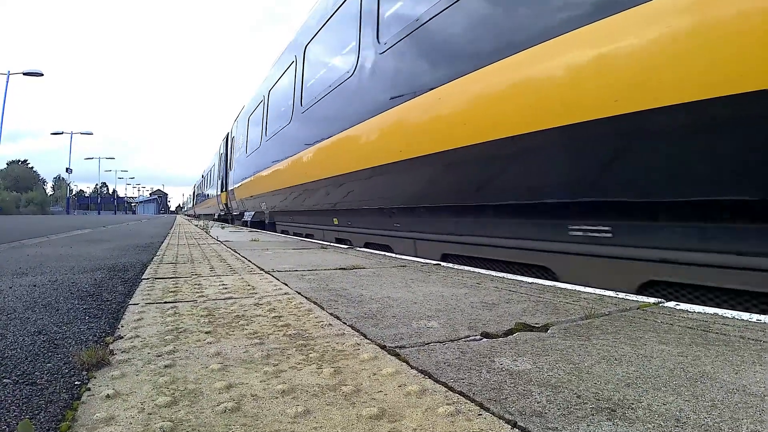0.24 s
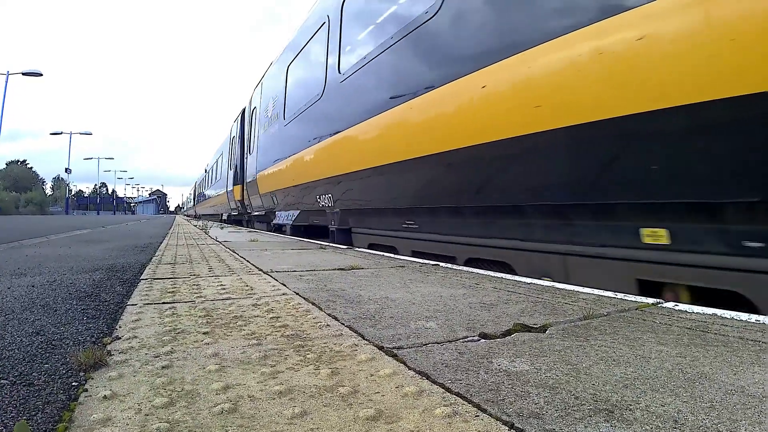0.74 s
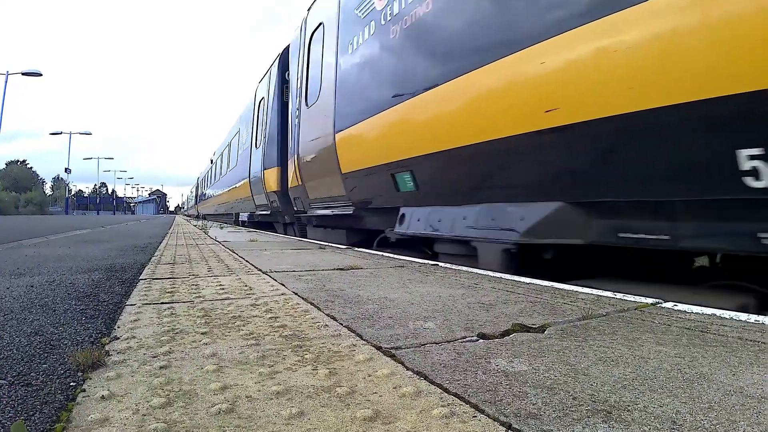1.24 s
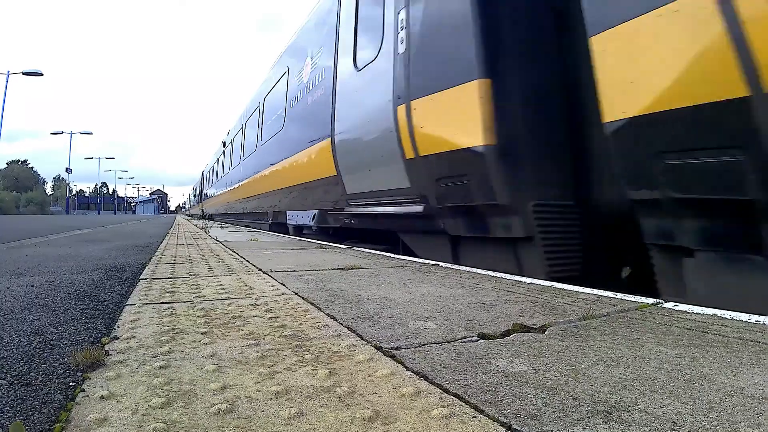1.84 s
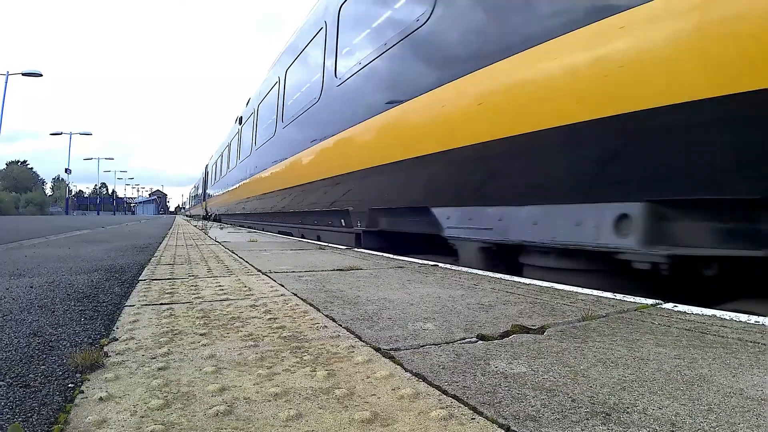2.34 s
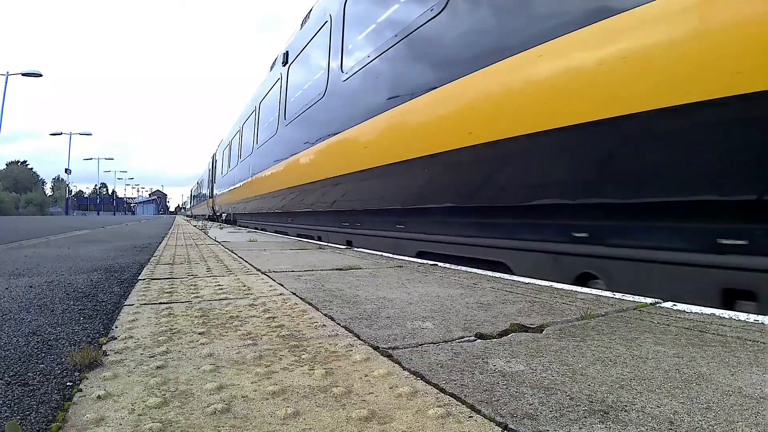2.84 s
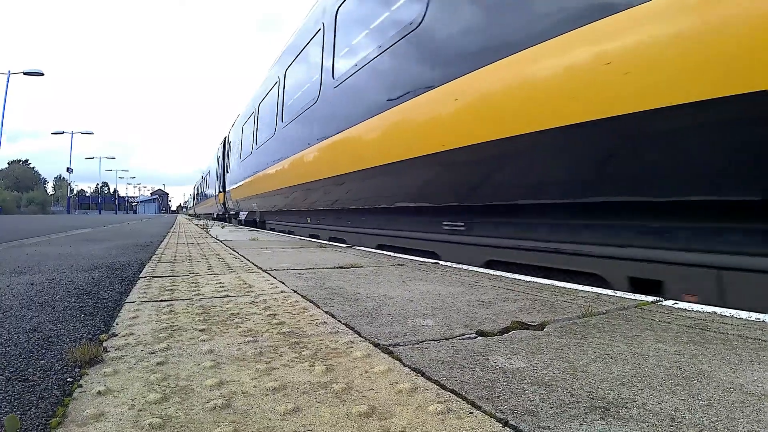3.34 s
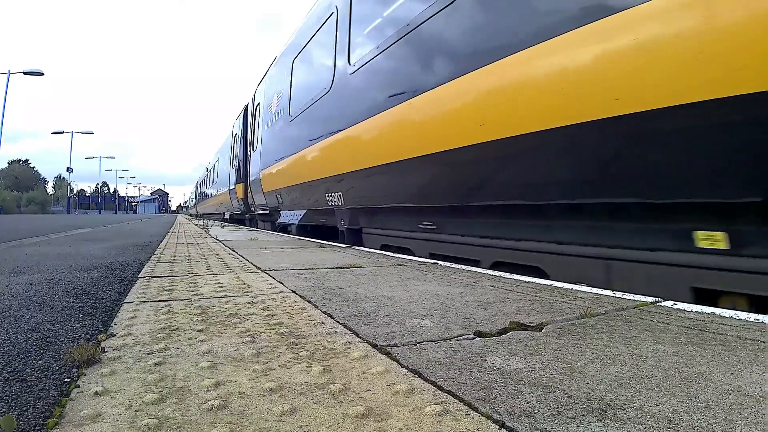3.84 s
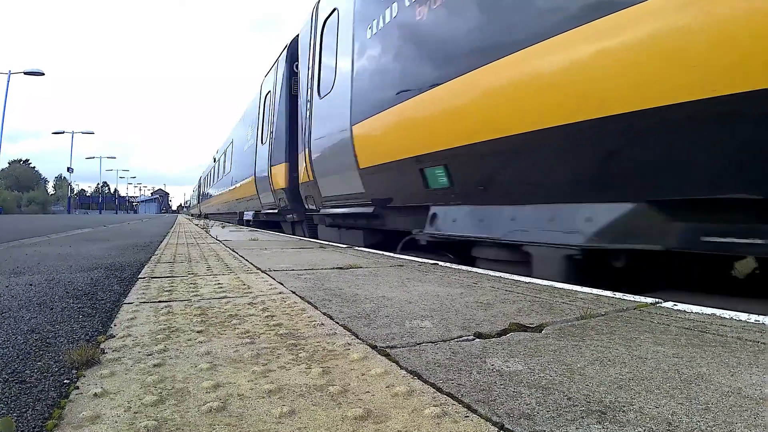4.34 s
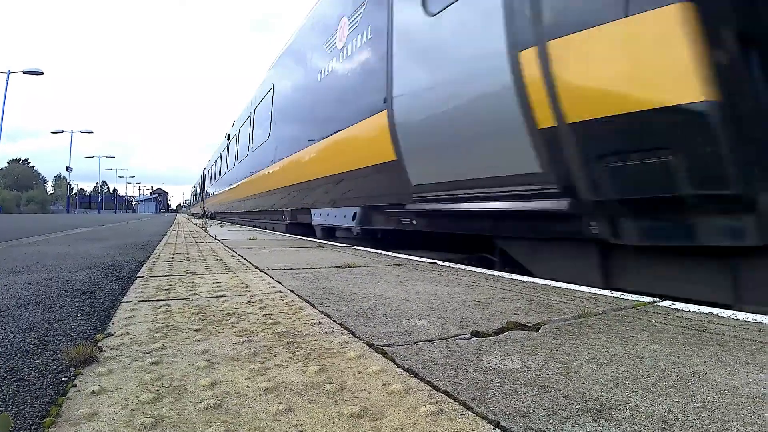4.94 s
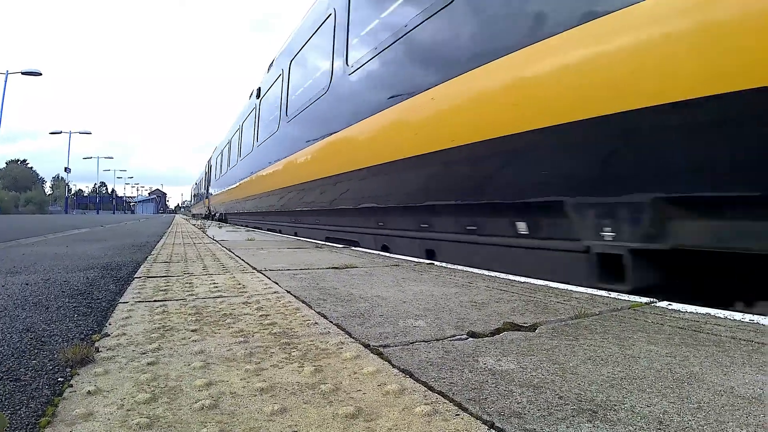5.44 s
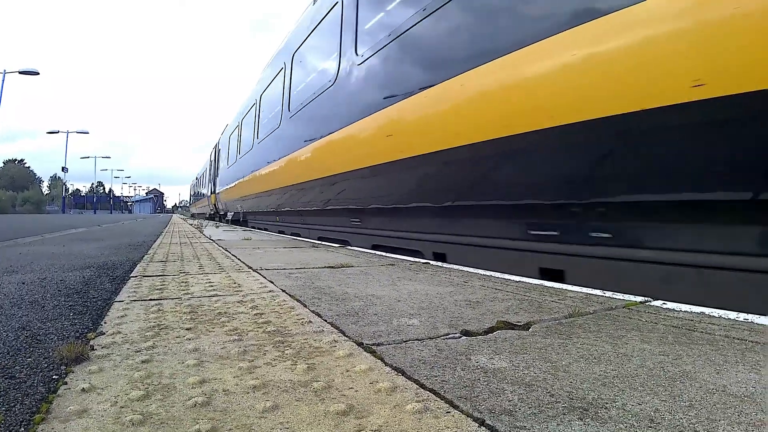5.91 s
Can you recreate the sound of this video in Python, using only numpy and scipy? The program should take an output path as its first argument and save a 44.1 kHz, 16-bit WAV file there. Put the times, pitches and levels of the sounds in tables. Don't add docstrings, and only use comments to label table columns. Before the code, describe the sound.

A diesel train is already passing close by an open platform, and keeps passing to the end, about 6.2 seconds. A deep, buzzing drone around 90 Hz dominates, throbbing and briefly dipping as engines beat against one another. From 0.3 to 1.5 s a rough casing roar and metallic rattle lie over it, with wheel rumble, low thuds and short rail ringing, brightest near 0.7 s. Knocks come at 0.9 and 1.65 s, then a loud dull one at 2.0 s. The drone is strongest and most overloaded around 1.6 to 2.3 s, then eases, lowest near 3.4 s, with faint pings and chirps around 2.7 and 3.1 s. It wavers on, with low chirps at 4.65 and 4.85 s, soft knocks and chirps near 5.2 to 5.5 s, before drone, roar and rumble surge from 5.8 s. The microphone is close, muffled, clipped and grainy.

```python
import sys
import numpy as np
from scipy import signal
from scipy.fft import rfft, irfft, next_fast_len
from scipy.io import wavfile
from scipy.ndimage import uniform_filter1d, map_coordinates

SR = 44100
rng = np.random.default_rng(int(sys.argv[2]) if len(sys.argv) > 2 else 0)


def ratio(d):
    e = np.asarray(d, float) / 20
    return 10 ** e


def generate_wav(sig):
    pcm = np.round(np.clip(np.atleast_2d(sig).T, -1, 1) * 32767).astype(np.int16)
    wavfile.write(sys.argv[1], SR, pcm)


N = 272097


def unit(x):
    return x / np.sqrt(np.mean(x ** 2) + 1e-20)


def curves(rows):
    seconds, *columns = np.transpose(rows)
    return [np.interp(np.arange(N) / SR, seconds, column) for column in columns]


def wobble(rate):
    points = rng.standard_normal(int(N * rate / SR) + 4)
    return map_coordinates(points, [np.arange(N) * rate / SR])


def filtered(x, response):
    size = next_fast_len(N + 8192)
    return irfft(rfft(x, size) * response(np.fft.rfftfreq(size, 1 / SR)), size)[:N]


def rush(spectrum, patchy_db):
    z = signal.stft(rng.standard_normal(N), nperseg=1024)[2]
    patches = uniform_filter1d(rng.standard_normal(z.shape), 5, 0)
    patches = uniform_filter1d(patches, 5, 1)
    noise = signal.istft(z * ratio(patchy_db * unit(patches)), nperseg=1024)[1][:N]
    f, db = np.transpose(spectrum)
    return unit(filtered(noise, lambda hz: ratio(np.interp(np.log(hz + 1), np.log(f + 1), db))))


def swells(s, width, *peaks_db):
    coarse = np.arange(0, N + 99, 100)
    bells = np.exp(-((coarse / SR - s[:, None]) / width[:, None]) ** 2)
    return [np.interp(np.arange(N), coarse, np.sqrt(ratio(2 * db) @ bells ** 2)) for db in peaks_db]


def swell(rows, rest_db):
    s, db, width = np.transpose(rows)
    return np.hypot(swells(s, width, db)[0], ratio(rest_db))


def drone_db():
    # time in seconds, firing tone in dB.
    nearest = [(0.0, -15), (0.15, -7), (0.27, -6.5), (0.95, -6.5), (1.25, -7.5), (1.6, -4.5), (1.84, -4),
               (2.37, -6), (2.99, -9), (3.44, -15.5), (3.73, -10.5), (4.15, -9.5), (4.8, -12), (5.0, -8.5),
               (5.4, -12.5), (5.65, -6.5), (5.9, -10), (6.17, -3)]
    # time in seconds, depth in dB, half width in seconds.
    beats = [(.38, -21.5, .05), (0.734, -26.5, .05), (1.078, -13.5, .06), (1.421, -3, 0.095),
             (1.7, -1.5, .05), (2.44, -1.5, 0.054), (3.985, -8, 0.11), (4.32, -14.5, 0.076),
             (4.611, -10.5, .06), (5.143, -18.5, .075), (5.36, -4, 0.058), (5.53, -27.5, 0.088),
             (5.799, -3, 0.038), (5.979, -6, 0.079)]
    t = np.arange(0, N + 99, 100) / SR
    power_left = [1 - (1 - ratio(2 * db)) * np.exp(-((t - s) / width) ** 2) for s, db, width in beats]
    dips_db = 10 * np.log10(np.prod(power_left, axis=0))
    return curves(nearest)[0] + np.interp(np.arange(N) / SR, t, dips_db)


def exhaust(phase):
    # time in seconds, peak in dB, half width in seconds.
    lopes = [(.03, -13, .05), (.33, -17, .1), (.85, -20.5, 0.24), (1.39, -13, .05), (1.52, -20.5, 0.06),
             (1.7, -12.5, 0.079), (2.2, -19.5, .15), (2.49, -21, 0.14), (2.83, -12, 0.076),
             (3.1, -24, 0.24), (3.33, -21, 0.068), (3.82, -24.5, 0.23), (5.7, -16.5, 0.062),
             (6.05, -29, .06)]
    # time in seconds, peak in dB, half width in seconds.
    overtone = [(0, -16, 0.048), (.25, -30, 0.14), (.42, -21, .08), (.72, -21, 0.049), (1.1, -21, 0.11),
                (1.39, -21, 0.046), (1.73, -13, 0.073), (2.4, -26, 0.036), (2.7, -28, 0.065),
                (2.9, -28.5, 0.16), (3.2, -25.5, 0.064), (3.55, -24, 0.098), (3.9, -28.5, .12),
                (4.13, -25.5, 0.048), (4.4, -27.5, 0.15), (4.85, -28, 0.082), (5.15, -28, 0.11),
                (5.55, -27.5, 0.14), (5.9, -22.5, 0.091), (6.17, -14, 0.031)]
    # multiple of the firing rate, level in dB.
    weak_orders = [(1.5, -3.5), (2.5, -19), (3, -6.5), (3.5, -7.5), (4, -12.5), (6, -11.5)]
    firing = ratio(drone_db() + 4.5) * np.sin(phase + 0.2 * wobble(14) + 0.096 * wobble(40))
    half_gain = swell(lopes, rest_db=-32) * ratio(4.0 + 1.6 * wobble(6.2))
    half = half_gain * np.sin(phase / 2 + 0.67 * wobble(12))
    double_gain = swell(overtone, rest_db=-37) * ratio(4.5)
    double = double_gain * np.sin(2 * phase + 0.78 * wobble(12))
    out = firing + half + double
    for multiple, db in weak_orders:
        out += ratio(db - 28.0 + 4.5 * wobble(8)) * np.sin(multiple * phase + 1.9 * wobble(10))
    return out


def wheels():
    # time in seconds, rumble in dB.
    bogies = [(0, -20.5), (.29, -25), (.38, -21), (.77, -17.5), (.88, -23), (1.06, -20), (1.44, -21),
              (1.65, -19.5), (1.84, -30), (2.06, -24), (2.2, -30.5), (3, -30), (3.8, -34.5), (4.6, -28),
              (5.45, -24.5), (5.8, -21.5), (6.1, -19), (6.17, -11.5)]
    # time in seconds, peak in dB, half width in seconds.
    thuds = [
        (.33, -20, 0.1),
        (1.05, -16.5, 0.093),
        (1.8, -18.5, 0.07),
        (2.15, -25.5, .1),
        (2.6, -22, .12),
        (3.86, -31.5, 0.076),
        (4.4, -30.5, 0.091),
        (5.19, -21, 0.045),
        (5.95, -18.5, 0.087),
    ]
    # frequency in Hz, level in dB per Hz.
    ground_colour = [(12, -37), (24, 2), (40, 2), (65, 3.5), (90, -2), (120, -40)]
    # frequency in Hz, level in dB per Hz.
    thrum_colour = [(70, -36.5), (100, 10.5), (130, 5.5), (170, 8), (210, 3.5), (270, -41.5)]
    # frequency in Hz, level in dB per Hz.
    wheel_colour = [(120, -34), (200, -10.5), (243, -2.5), (270, 0), (317, 1.5), (383, -5.5), (428, -4.5),
                    (700, -17.5), (910, -40.5), (1540, -120)]
    rumble_db = curves(bogies)[0]
    nearer_db = rumble_db + 29
    shake_db = -32.5 + 0.7 * nearer_db + 2.0 * wobble(5)
    thrum_db = -28 + 0.43 * nearer_db
    ground = ratio(shake_db + 4.0) * rush(ground_colour, patchy_db=3.0)
    thrum = swell(thuds, thrum_db) * ratio(-1.0) * rush(thrum_colour, patchy_db=-0.6)
    rumble = ratio(rumble_db + 2.5 + 0.39 * wobble(12)) * rush(wheel_colour, patchy_db=1.5)
    return ground + thrum + rumble


def casing(phase):
    # time in seconds, roar in dB.
    engines = [(0, -22.5), (.25, -20.5), (.32, -17.5), (.6, -17), (.72, -14), (.95, -15.5), (1.25, -18),
               (1.49, -20), (1.54, -27), (1.88, -31), (2.1, -29.5), (2.75, -30), (3.6, -34), (4.3, -31.5),
               (4.8, -28.5), (5.4, -27.5), (5.95, -17.5), (6.17, -19)]
    # frequency in Hz, level in dB per Hz.
    far_colour = [(350, -36), (600, 4.5), (618, -10), (794, 0.5), (1230, -1.5), (1330, 1.5), (1520, -9.5),
                  (1720, -9), (1900, -19), (2470, -42.5), (4180, -120)]
    # frequency in Hz, level in dB per Hz.
    near_colour = [(350, -35), (600, 0.5), (664, -11), (717, 4.5), (775, -5), (849, 0), (935, -3.5),
                   (1300, -1), (1900, -11), (2470, -44), (4180, -120)]
    # frequency in Hz, level in dB per Hz.
    rattle_colour = [(1000, -28), (1700, -1.5), (1910, -3), (2300, -4), (2460, -8), (2820, -16),
                     (3420, -22), (4000, -27.5), (5200, -58), (8800, -120)]
    roar_db = curves(engines)[0]
    lag_s = 0.056
    late_roar_db = curves(np.add(engines, [lag_s, 0]))[0]
    rattle_db = -41.5 + 1.06 * (late_roar_db + 29) + 0.58 * wobble(9.8)
    near = np.clip((roar_db + 29) / 8, 0, 1)
    roar = np.sqrt(1 - near) * rush(far_colour, patchy_db=0.8)
    roar += np.sqrt(near) * rush(near_colour, patchy_db=1.5)
    roar *= ratio(roar_db - 0.57 + 0.4 * wobble(12))
    rattle = ratio(rattle_db + 1.0) * rush(rattle_colour, patchy_db=1.0)
    throb = ratio(0.57 * np.sin(phase) + 0.13 * wobble(30))
    return unit(throb) * (roar + rattle)


def rail():
    # time in seconds, half width in seconds,
    # level of the wheel disc in dB, of low rail tones in dB, of high rail tones in dB.
    passes = [
        (.12, .07, -26.5, -35.5, -34),
        (0.499, .07, -19.5, -27, -31.5),
        (0.601, 0.037, -21.5, -27.5, -38),
        (.72, 0.09, -22, -19.5, -17),
        (1.05, .12, -27, -30, -28),
        (1.411, 0.054, -28.5, -32.5, -32),
    ]
    # pitch in Hz, unsteadiness per second, level in dB.
    disc_modes = [(532.6, 14, 3)]
    # pitch in Hz, width in Hz (also unsteadiness per second), level in dB.
    low_modes = [(250.7, 14, 2.5), (309, 17, -3.5), (733, 8.1, 0.5), (842, 15, -9)]
    # pitch in Hz, width in Hz (also unsteadiness per second), level in dB.
    high_modes = [(1266, 16, 2), (1705, 12, -11.5), (2140, 13, -9)]
    s, width, *levels = np.transpose(passes)
    out, t = np.zeros(N), np.arange(N) / SR
    for modes, near in zip((disc_modes, low_modes, high_modes), swells(s, width, *levels)):
        for hz, rate, db in modes:
            gain = np.sqrt(2) * near * ratio(db + 0.9 * wobble(rate))
            out += gain * np.sin(2 * np.pi * hz * t + 1.0 * wobble(rate))
    return out


def knocks():
    # start in seconds, level in dB, centre in Hz, width as a share of the centre,
    # time to fade by 60 dB in seconds.
    hits = [
        (0.92, -19, 885, 0.82, 0.02),
        (1.65, -15, 997, 0.49, 0.2),
        (2.027, -7, 651, 0.96, 0.013),
        (2.253, -25, 810, 0.51, 0.034),
        (2.64, -28, 876, .15, 0.13),
        (2.715, -26.5, 916, 0.11, 0.18),
        (5.249, -25, 420, 0.28, .08),
        (5.49, -27, 790, 0.31, 0.23),
    ]
    out, t = np.zeros(N + SR), np.arange(SR // 4) / SR
    for s, db, hz, width, t60 in hits:
        edge = 1 + np.clip(width, .02, 2)
        b, a = signal.butter(2, [hz / edge, hz * edge], "bandpass", fs=SR)
        attack = 1 - np.exp(-t / (0.099 * t60))
        fade = ratio(db - 60 * t / t60) * attack
        noise = signal.lfilter(b, a, rng.standard_normal(2 * len(t)))[len(t):]
        burst = unit(fade * noise) * np.sqrt(np.mean(fade ** 2))
        out[round(s * SR):][:len(t)] += burst
    return out[:N]


def squeals():
    # middle in seconds, half length in seconds, peak in dB, pitch in Hz, glide in Hz per second.
    chirps = [
        (2.66, 0.018, -28.5, 800, 503),
        (2.655, .02, -30.5, 919, 802),
        (3.05, 0.021, -31.5, 788, 297.5),
        (3.082, 0.022, -32.5, 928, 1802),
        (4.65, .025, -19.5, 304, 103),
        (4.835, 0.018, -23.5, 511, -300),
        (5.51, 0.025, -22.5, 711, 301.5),
        (5.55, .025, -27, 898, 200),
    ]
    out, t = np.zeros(N), np.arange(N) / SR
    flutter = .5 * wobble(60)
    for s, width, db, hz, glide in chirps:
        near = slice(round((s - .1) * SR), round((s + .1) * SR))
        u = t[near] - s
        bell = np.exp(-(u / width) ** 2)
        tone = np.sin(2 * np.pi * (hz + glide * u / 2) * u + flutter[near])
        out[near] += np.sqrt(2) * ratio(db) * bell * tone
    return out


def overload():
    return ratio(1.2 * np.clip(drone_db() + 8.0, 0, 4) - 0.19)


def scene():
    # time in seconds, firing rate in Hz.
    firing_rate = [(0.0, 86.65), (0.14, 89.88), (0.38, 89.51), (0.46, 90.88), (0.65, 90.52), (0.72, 92.76),
                   (0.82, 91.66), (1.79, 92.76), (2.35, 89.37), (5.14, 90.25), (5.24, 91.93), (5.53, 90.57),
                   (5.62, 93.33), (5.84, 92.5), (5.98, 99.7), (6.17, 96.33)]
    phase = 2 * np.pi * np.cumsum(curves(firing_rate)[0]) / SR
    train = exhaust(phase) + wheels() + casing(phase) + rail() + knocks() + squeals()
    return (overload() * train)[None]


def squeeze(x, slow_rate):
    error_db, mute_db = -4.5, -84.5
    hz, t, z = signal.stft(x, slow_rate, nperseg=512)
    band_db = uniform_filter1d(20 * np.log10(np.abs(z) + 1e-9), size=17, axis=0)
    error = rng.standard_normal(z.shape) + 1j * rng.standard_normal(z.shape)
    uneven_db = 3.5 * rng.standard_normal((17, len(t))).repeat(16, 0)[:len(hz)]
    heard = (hz[:, None] < 2600) | (band_db > mute_db + uneven_db)
    rough = (z + ratio(band_db + error_db) * error) * heard
    return signal.istft(rough, nperseg=512)[1][:len(x)]


def roll_off(x):
    return signal.sosfilt(signal.butter(12, 15870, fs=SR, output="sos"), x)


def record(dry):
    slow_rate = 8000
    slow = signal.resample_poly(dry[0], slow_rate // 100, SR // 100)
    slow = squeeze(np.clip(slow, -.699, .699), slow_rate)
    slow = np.clip(slow, -.704, .704)
    smoothing = signal.firwin(441 * 26 + 1, 3880, fs=slow_rate * 441, window=("kaiser", 9.))
    full = signal.resample_poly(slow, SR // 100, slow_rate // 100, window=smoothing)[:N]
    full = np.pad(full, (0, N - len(full)))
    hiss = ratio(-97) * rng.standard_normal(N)
    full = np.clip(full, -.7035, .7035) + hiss
    return roll_off(full[None])


dry = scene()
out = record(dry)
generate_wav(out)
```